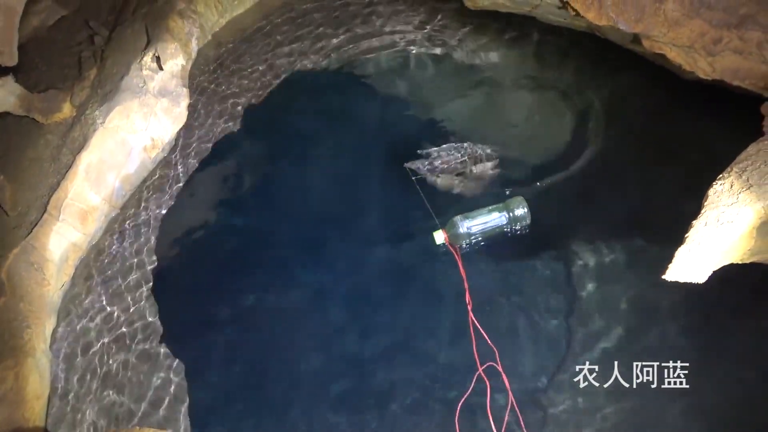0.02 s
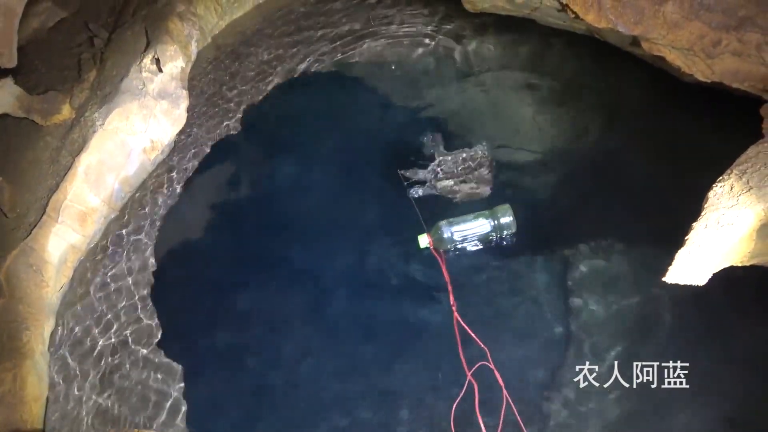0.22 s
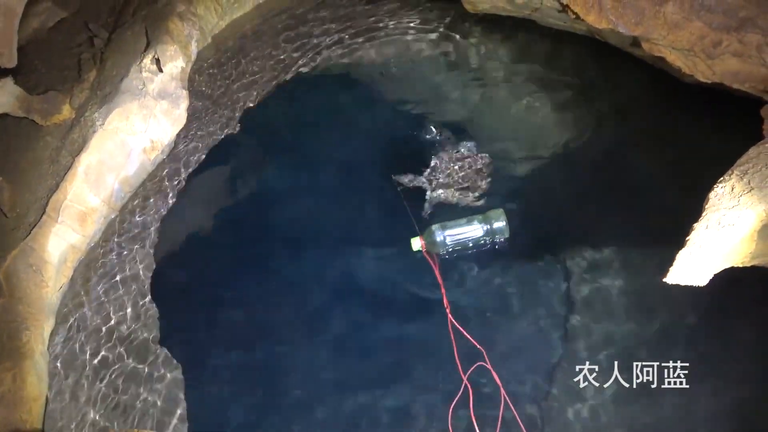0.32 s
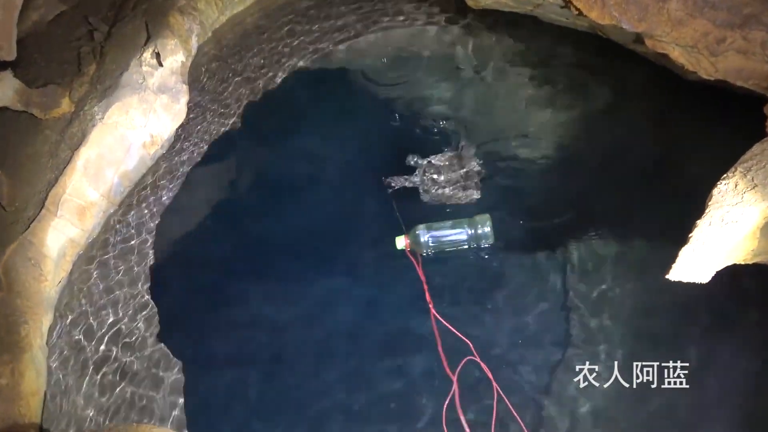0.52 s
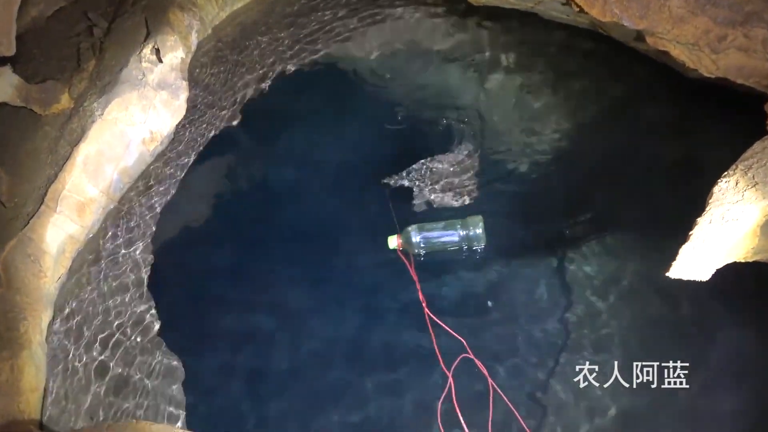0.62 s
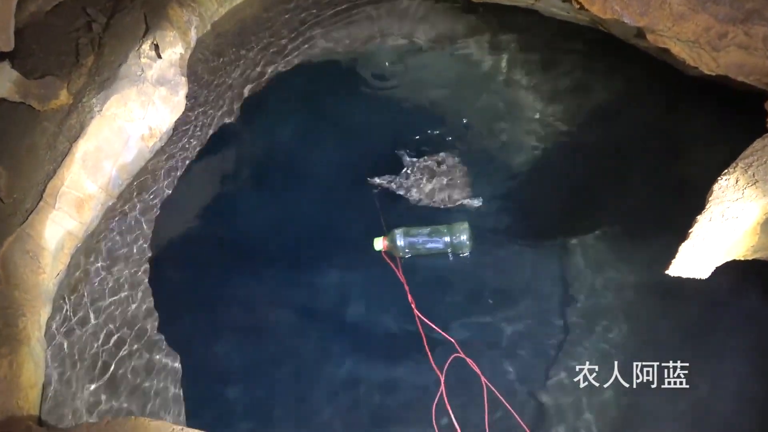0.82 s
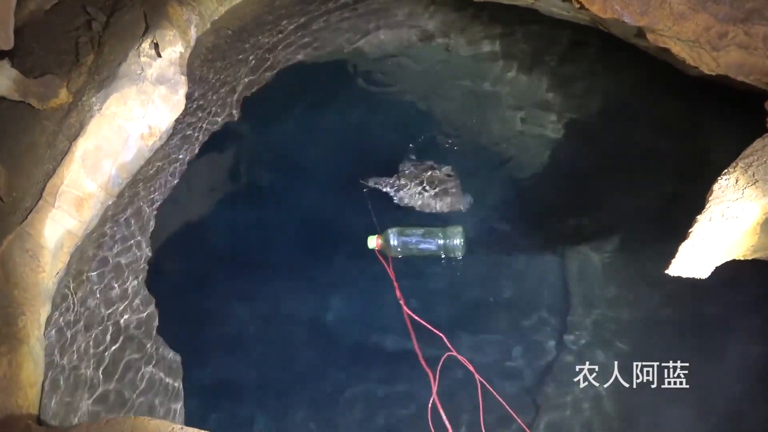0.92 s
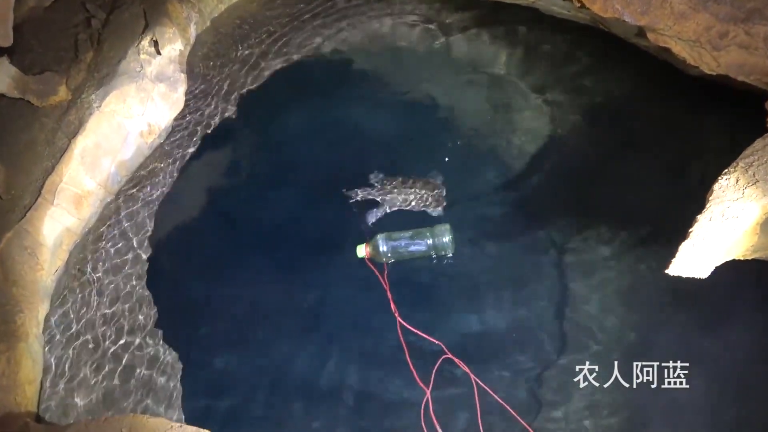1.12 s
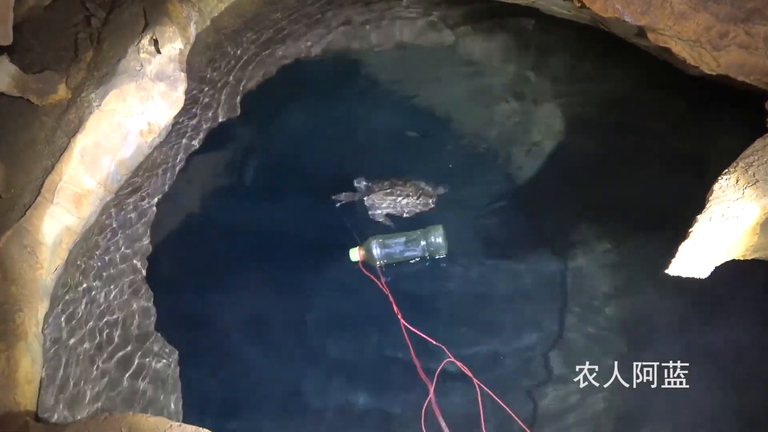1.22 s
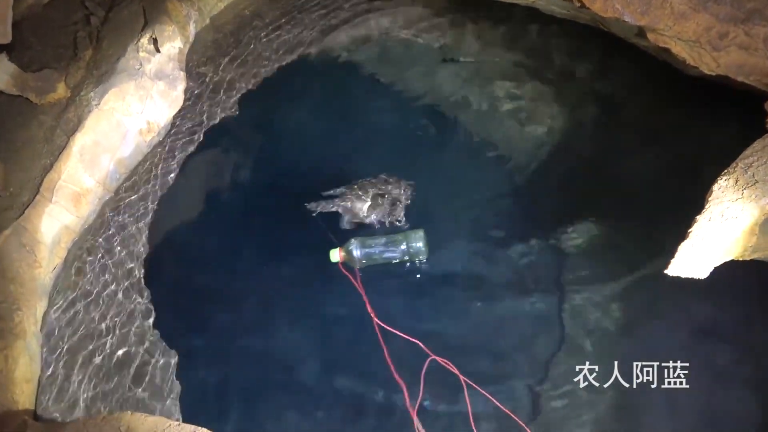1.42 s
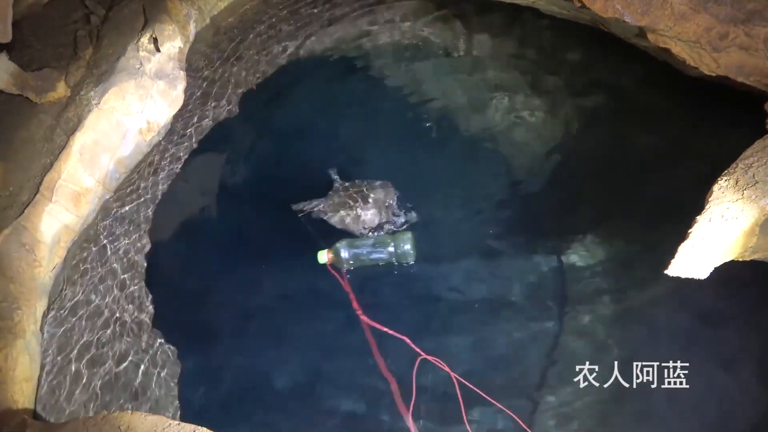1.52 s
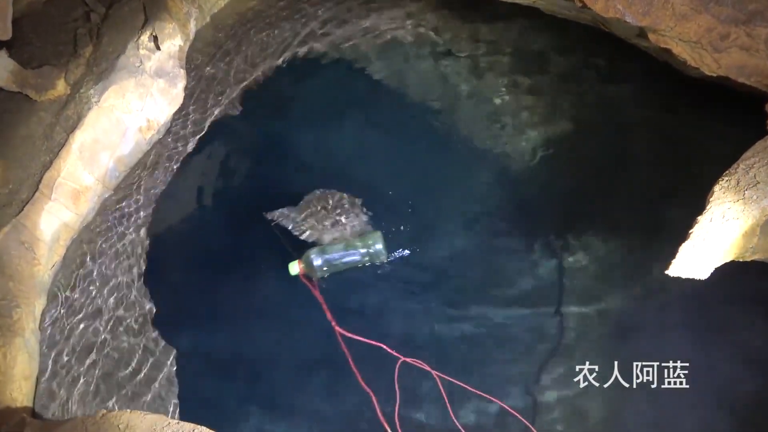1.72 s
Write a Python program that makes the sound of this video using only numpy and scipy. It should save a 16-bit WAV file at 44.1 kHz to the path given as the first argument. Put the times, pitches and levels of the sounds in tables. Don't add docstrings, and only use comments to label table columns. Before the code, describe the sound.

Dripping water in a rock cave, heard close in stereo: crisp ringing drops, then a bubbling plop and strongest plink, near quiet with faint low blips, and final light plinks, over soft hiss and high electronic whine.

```python
import sys
import numpy as np
from scipy import signal
from scipy.io import wavfile
from scipy.ndimage import uniform_filter1d

SR = 44100
rng = np.random.default_rng(int(sys.argv[2]) if len(sys.argv) > 2 else 0)


def wav_out(sig):
    wavfile.write(sys.argv[1], SR, np.round(np.clip(np.atleast_2d(sig).T, -1, 1) * 32767).astype(np.int16))


def decibels_to_gain(level_db):
    exponent = np.asarray(level_db, float) / 20
    return 10 ** exponent


N = 79380


def evened(x):
    return x / np.sqrt(np.mean(x ** 2) + 1e-20)


def read(points, hz):
    f, value = np.transpose(points)
    return np.interp(np.log(hz + 1), np.log(f + 1), value)


def add(mix, s, sound):
    part = mix[round(s * SR):][:len(sound)]
    part += sound[:len(part)]


def bubble(hz, cycles, rise, attack_cycles):
    turns = np.arange(0, 7 * cycles / hz, 1 / SR) * hz
    climb = turns + .5 * rise * np.minimum(turns, 3 * cycles) * turns
    swell = 1 - np.exp(-turns / attack_cycles)
    return swell * np.exp(-turns / cycles) * np.sin(2 * np.pi * climb)


# t/s, level/dB, bubble f/Hz, ring [cycles], tick level over the bubble/dB
DROPS = [(0.238, -30.5, 5300, 4.2, -3.5), (0.24, -31.5, 4600, 10.2, -12), (0.242, -29, 4930, 5.3, -10),
         (.2465, -33, 5750, 6.4, -15), (0.25, -39.5, 5270, 7.6, -20), (.253, -40, 6280, 6.4, -20),
         (.270, -41, 4750, 10, -15), (0.3375, -43, 1940, 4.9, -12), (0.39, -55, 7500, 23, -25),
         (.394, -51, 7700, 28, -21), (.4475, -52.5, 3340, 12, -25), (0.4664, -39.5, 3480, 15.5, -6),
         (0.4955, -50, 5780, 43, -14), (0.496, -53, 7250, 26, -27), (.530, -54.5, 3600, 16, -25),
         (0.5806, -32.5, 4430, 9, -4.5), (0.582, -20, 5360, 1.7, -13), (.5862, -40, 4600, 7.1, -8),
         (.5955, -35, 4600, 14, -20), (.611, -40, 4650, 9, -12), (.626, -43, 4400, 8, -15),
         (.598, -42, 5250, 15, -23), (0.7435, -40, 2470, 9, -5), (.751, -47, 2520, 8, -20),
         (.760, -45.5, 2470, 14, -17), (.756, -53, 3110, 10, -20), (.484, -56, 10550, 46, -20),
         (.468, -56, 10000, 44, -20), (1.584, -46, 3300, 5.5, -5), (0.9562, -67, 3240, 15, -13),
         (1.545, -51.5, 2640, 6.2, -21), (1.5651, -45.5, 4800, 18.5, 2.5), (1.5812, -32, 8080, 8, -6.5),
         (1.590, -46.5, 2050, 34, -20), (1.584, -50.5, 1250, 13, -38), (1.593, -47, 1256, 11, -38),
         (1.574, -47, 3500, 4.3, -8), (1.645, -51.5, 3440, 4.7, -12), (1.665, -46, 2400, 8, -20),
         (1.6668, -34.5, 2590, 3.3, -6), (1.673, -47, 2320, 13, -25), (1.707, -53.5, 2280, 13, -25),
         (1.737, -52.5, 2120, 5.4, 3.5), (0.614, -47, 3900, 9.9, -30)]


def plinks():
    gain_db, pan_db = 3.0, 0.5
    ticks, rings = np.zeros(N), np.zeros(N)
    for s, db, hz, cycles, tick_db in DROPS:
        low_cut = signal.butter(4, 0.95 * hz, "high", fs=SR)
        high_cut = signal.butter(2, min(1.3 * hz, 18000), fs=SR)
        tick = signal.lfilter(*low_cut, signal.unit_impulse(256))
        tick = signal.lfilter(*high_cut, tick)
        add(ticks, s, decibels_to_gain(db + tick_db + gain_db) * tick / abs(tick).max())
        add(rings, s, decibels_to_gain(db + gain_db) * bubble(hz, cycles, rise=0.0006, attack_cycles=0.74))
    return cave(ticks, pan_db, echo_db=0, wet_db=2.5) + cave(rings, pan_db, echo_db=-5, wet_db=-5)


# t/s, level/dB, f/Hz, ring [cycles], pitch rise [per cycle]
LARGE_BUBBLES = [(0.4132, -36, 288.6, 12.6, 0.0043), (.444, -35, 535, 3, 0.002),
                 (.4565, -18, 561, 3.93, 0.0059), (.464, -22, 680, 7.1, 0.0122),
                 (.4755, -24, 570, 6, 0.0022), (.486, -26, 700, 4.5, 0.002), (.4995, -29, 645, 4.5, 0.003),
                 (.446, -39, 270, 4, .002), (.468, -38, 390, 4.1, .002), (0.483, -42, 1420, 14, 0.0005),
                 (.494, -38, 1390, 17, .0005), (0.493, -48, 2300, 8.7, 0.0005),
                 (.524, -40.5, 2135, 10, 0.0014), (0.5227, -38.5, 1582, 12.3, 0.0014),
                 (.536, -37.5, 1357, 7.2, 0.0009), (.505, -41.5, 1370, 13, .0005),
                 (.53, -50, 511, 13.6, 0.0027), (0.577, -47.5, 1637, 14, 0.00073),
                 (0.584, -47.5, 1320, 13, 0.0016), (.555, -52, 1630, 8.8, .001),
                 (.604, -52.5, 1380, 10, 0.0028), (1.263, -48, 345, 7.6, 0.0005),
                 (1.252, -50.5, 243, 3.1, .002), (1.258, -53, 150, 4.7, 0.0025),
                 (1.2, -52, 189.9, 1.8, .002), (1.326, -47.5, 223, 3, 0.0013),
                 (1.35, -48.5, 246, 2.5, .002), (1.385, -54.5, 213, 3, .002), (1.2, -54, 227, 2.7, .002),
                 (1.4, -59, 650, 5, 0.0015), (1.612, -50, 1057, 16.5, 0.002), (1.66, -53, 1060, 10.5, .002),
                 (1.721, -56.5, 425, 4, .002), (.413, -44.5, 181, 3.1, 0.02)]


def gulps():
    out = np.zeros(N)
    for s, db, hz, cycles, rise in LARGE_BUBBLES:
        add(out, s, decibels_to_gain(db) * bubble(hz, cycles, rise, attack_cycles=1.24))
    return cave(out, pan_db=1.2, echo_db=-12, wet_db=-9)


# start t/s, length t/s, level/dB, first f/Hz, last f/Hz
BUBBLE_CLOUDS = [(.44, 0.06, -45, 330, 420), (.47, .13, -46, 431, 496), (0.487, .12, -42.5, 1230, 1990),
                 (0.507, .1, -48, 594, 1010), (1.254, .05, -57.5, 300, 870), (1.575, .07, -42, 2800, 1330),
                 (0.597, .07, -42, 3620, 3700), (1.70, 0.095, -60.5, 420, 490),
                 (.49, .12, -46.5, 2300, 2320), (.53, .13, -45, 1450, 1650), (1.255, 0.064, -57, 800, 950),
                 (1.29, .08, -54, 270, 230), (0.44, .05, -52.5, 730, 690)]


def froth(count=16):
    spread, fade_db, size_db = 0.22, -16, 5.6
    out = np.zeros(N)
    for s, length, db, first_hz, last_hz in BUBBLE_CLOUDS:
        for k, (late, off, size) in enumerate(rng.uniform(-1.002, 1, (count, 3))):
            u = (k + .5 + .5 * late) / count
            hz = first_hz * (last_hz / first_hz) ** u * np.exp(spread * off)
            level = decibels_to_gain(db + fade_db * u + size_db * size)
            add(out, s + u * length, level * bubble(hz, cycles=3.7, rise=0.018, attack_cycles=0.57))
    return cave(out, pan_db=0.33, echo_db=-15, wet_db=-1.8)


# t/s, level/dB, centre f/Hz, length t/s
DROPLETS = [(.008, -59, 8740, 0.0036), (0.0604, -55, 12300, 0.0014), (0.11, -60, 8000, .001),
            (0.18, -62, 8300, 0.0024), (0.346, -64, 11900, 0.0056), (0.4135, -39.5, 11800, 0.0025),
            (.413, -45.5, 4880, 0.0037), (.81, -60, 11210, 0.0012), (0.868, -66.5, 7240, 0.024),
            (0.956, -61.5, 6668, 0.0025), (1.047, -68.5, 6225, 0.0091), (1.13, -63, 10100, 0.0018),
            (1.177, -63, 8800, 0.0017), (1.2555, -70, 2370, 0.04), (1.282, -58.5, 11000, 0.0014),
            (1.307, -67.5, 4170, 0.015), (1.384, -73, 9900, .002), (1.4216, -61.5, 9250, 0.02),
            (1.542, -63.5, 7150, 0.0035), (1.589, -55, 5850, 0.0057), (0.338, -57, 3450, 0.007),
            (1.7255, -48, 9960, 0.00097), (0.743, -53, 10200, 0.0051)]


def spray():
    width = 0.35
    out, t = np.zeros(N), np.arange(4096) / SR
    for s, db, hz, length in DROPLETS:
        clicks = rng.standard_normal(4096) * decibels_to_gain(4.3 * rng.exponential(1, 4096))
        edges = [hz / (1 + width), min(hz * (1 + width), 20000)]
        band = signal.butter(2, edges, "band", fs=SR)
        puff = evened(signal.lfilter(*band, clicks * np.exp(-t / length)))
        add(out, s, decibels_to_gain(db) * puff * np.sqrt(length / t[-1]))
    return cave(out, pan_db=1.6, echo_db=-19, wet_db=1.5)


# delay t/s, left level/dB, right level/dB
ROCK_ECHOES = [
    (.0018, -1.5, -4),
    (.0045, -9, -8.5),
    (.0078, -9.5, 0),
    (.0125, -7, -10),
    (.018, -17, -20),
    (.024, -18, -6),
]
# f/Hz, time to fall 60 dB t/s
TAIL_TIMES = [(200, 0.43), (700, 0.22), (2500, 0.22), (5000, 0.21), (9000, 0.16), (15000, 0.12)]


def cave(x, pan_db, echo_db, wet_db):
    same = 0.96
    shared, own = rng.standard_normal(SR // 2), rng.standard_normal((2, SR // 2))
    noise = same * shared + np.sqrt(1 - same ** 2) * own
    hz, t, z = signal.stft(noise, SR, nperseg=256)
    decay = decibels_to_gain(-60 * t / read(TAIL_TIMES, hz)[:, None])
    tail = signal.istft(z * decay, SR, nperseg=256)[1]
    tail *= np.clip(np.arange(tail.shape[1]) / SR / 0.0031 - .4, 0, 1)
    room = decibels_to_gain(wet_db) * tail / np.linalg.norm(tail[0])
    room[:, 0] += 1
    for delay, left_db, right_db in ROCK_ECHOES:
        room[:, round(delay * SR)] += decibels_to_gain(echo_db + np.array([left_db, right_db]))
    sides = decibels_to_gain(np.array([[pan_db], [-pan_db]]))
    return signal.fftconvolve(x[None], room, axes=1)[:, :N] * sides


# f/Hz, level/dB
WATER_COLOUR = [(25, -11), (42, -15.5), (75, -8), (300, -13), (800, -11), (1300, -14), (1600, -21),
                (3300, -28.5)]
# f/Hz, level/dB
HISS_COLOUR = [(1500, -40), (3300, -29.5), (6000, -22.5), (12500, -27.5), (14100, -31), (14500, -66)]
# f/Hz, likeness [-1 to 1]
SIDE_LIKENESS = [(60, 1), (180, 0.26), (550, 0.65), (1650, 0.85), (4970, 0.66), (15000, 0.18)]


def murmur():
    frames, hz = N // 256 + 5, np.fft.rfftfreq(1024, 1 / SR)
    a, b, c, d, patches = rng.standard_normal((frames, 513, 5)).T
    patches = uniform_filter1d(patches, size=14, axis=0)
    patches = evened(uniform_filter1d(patches, size=10, axis=1))
    flicker = evened(uniform_filter1d(rng.standard_normal(frames), size=5))
    same = read(SIDE_LIKENESS, hz)[:, None]
    left = a + 1j * b
    right = same * left + np.sqrt(1 - same ** 2) * (c + 1j * d)
    water_db = read(WATER_COLOUR, hz) - 23 * (hz > 4000) * np.log2(hz / 4000 + 1e-9)
    colour = np.hypot(decibels_to_gain(water_db), decibels_to_gain(read(HISS_COLOUR, hz)))
    z = np.array([left, right]) * colour[:, None] * decibels_to_gain(1.34 * patches + 1.03 * flicker)
    return decibels_to_gain(-61) * evened(signal.istft(z, nperseg=1024, noverlap=768)[1][:, :N])


# t/s, level/dB, left over right level/dB, left lag [rad]
WHINE_DRIFT = [
    (0, -55.5, .8, 1.15),
    (.25, -55.5, 0, 1),
    (.38, -54.5, .6, .9),
    (.55, -54.5, 1, .6),
    (.72, -53.5, 6, .33),
    (.95, -55, 6.5, .45),
    (1.2, -53, 5.5, 0.36),
    (1.35, -54.5, 5.5, .45),
    (1.55, -54.5, 5, 0.32),
    (1.8, -54.5, 3, .33),
]


def whine():
    whine_hz, waver_hz = 15684.5, .45
    s, db, pan_db, lag = np.transpose(WHINE_DRIFT)
    t = np.arange(N) / SR
    waver = uniform_filter1d(rng.standard_normal(N), size=2500)
    waver = evened(uniform_filter1d(waver, size=2500))
    sides = np.array([[.5], [-.5]])
    phase = 2 * np.pi * np.cumsum(whine_hz + waver_hz * waver) / SR
    tone = np.sqrt(2) * np.sin(phase - sides * np.interp(t, s, lag))
    return tone * decibels_to_gain(np.interp(t, s, db) + sides * np.interp(t, s, pan_db))


def scene():
    return plinks() + gulps() + froth() + spray() + murmur() + whine()


def top_cut(x):
    return signal.sosfilt(signal.butter(12, 17170, fs=SR, output="sos"), x)


def record(dry):
    edge_hz = 15950
    low_pass = signal.firwin(801, edge_hz, window=("kaiser", 9), fs=SR)
    mix = signal.oaconvolve(dry, low_pass[None], "same")
    return top_cut(mix)


dry = scene()
out = record(dry)
wav_out(out)
```